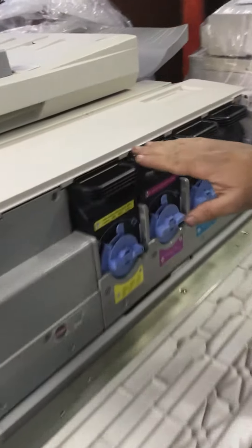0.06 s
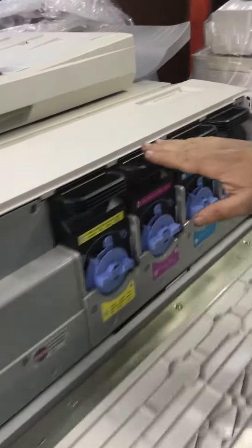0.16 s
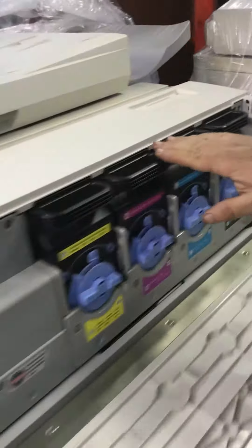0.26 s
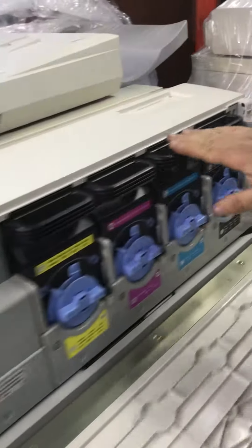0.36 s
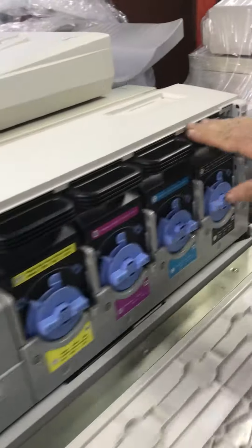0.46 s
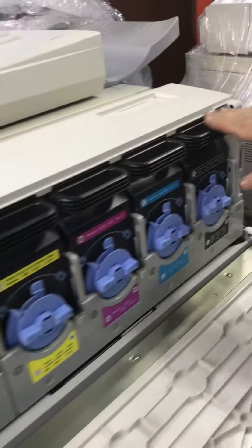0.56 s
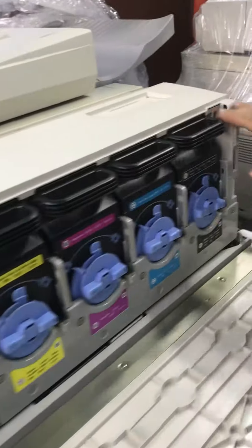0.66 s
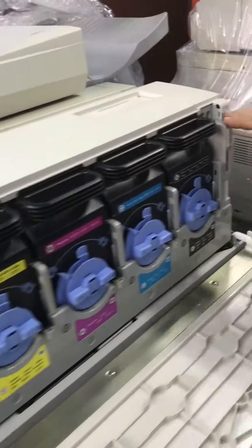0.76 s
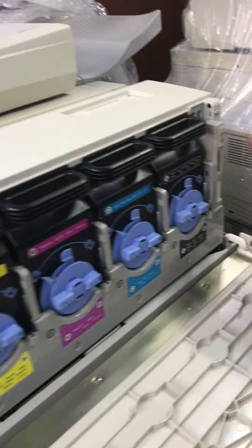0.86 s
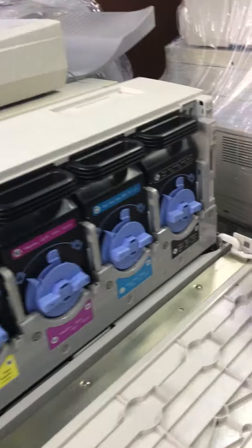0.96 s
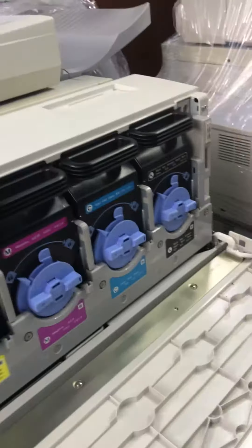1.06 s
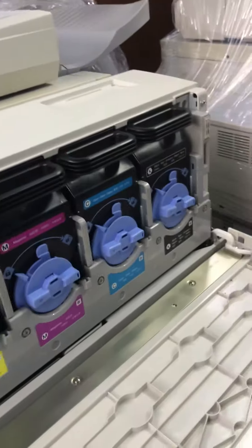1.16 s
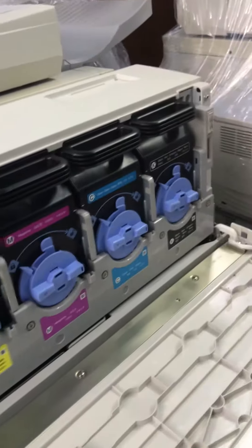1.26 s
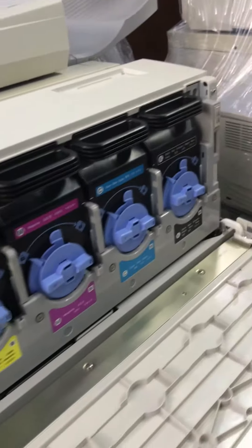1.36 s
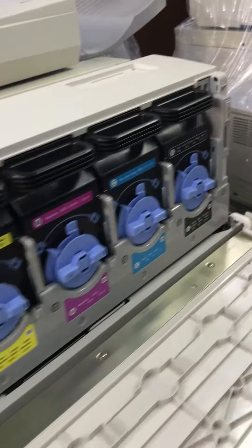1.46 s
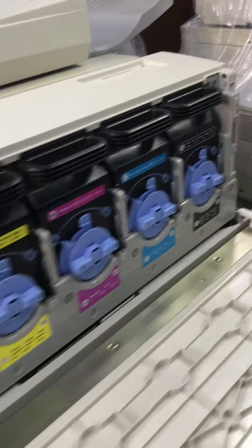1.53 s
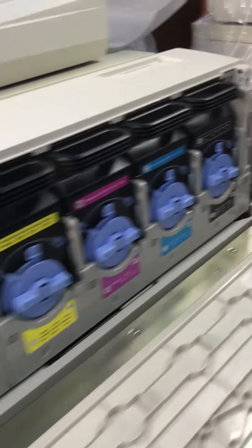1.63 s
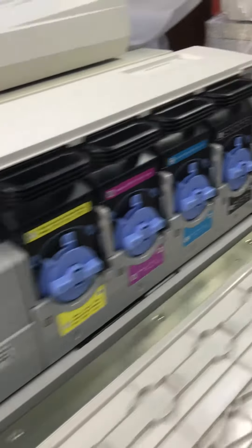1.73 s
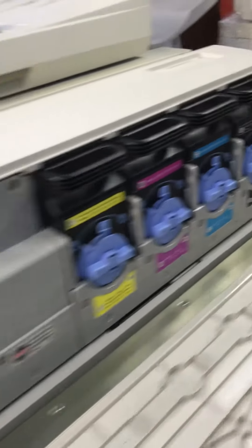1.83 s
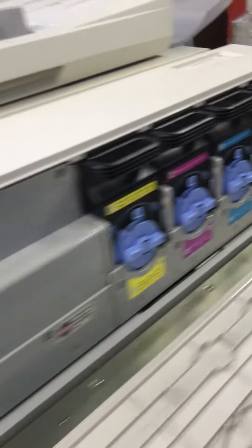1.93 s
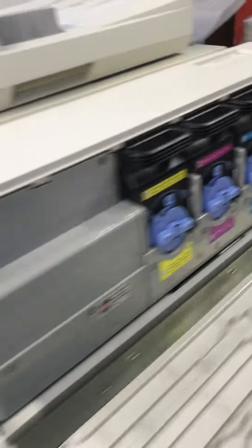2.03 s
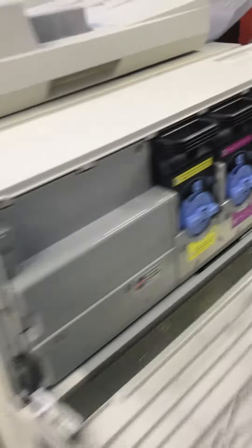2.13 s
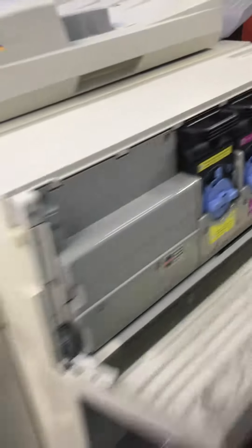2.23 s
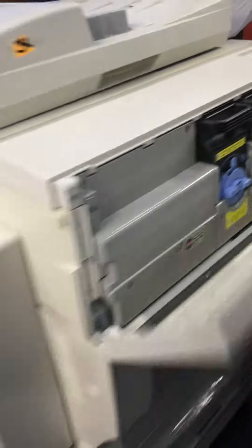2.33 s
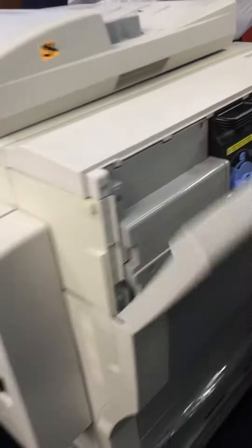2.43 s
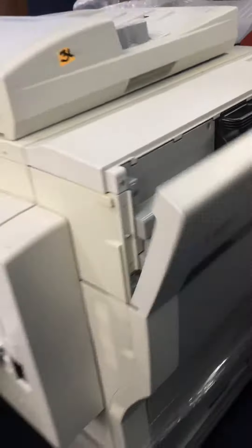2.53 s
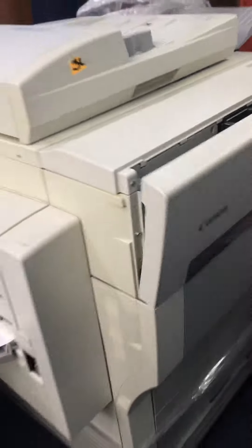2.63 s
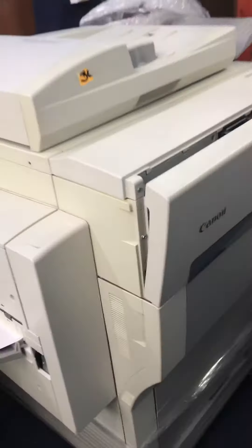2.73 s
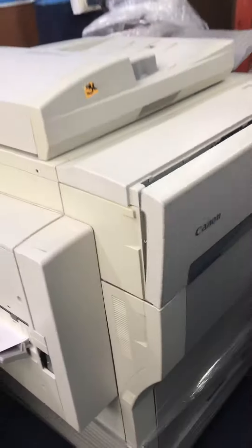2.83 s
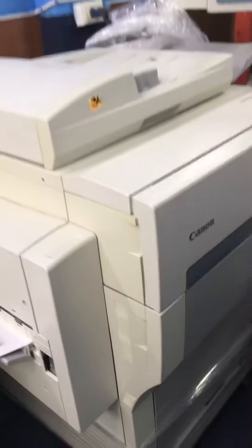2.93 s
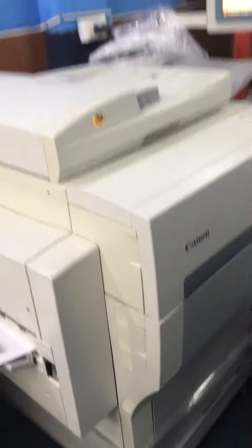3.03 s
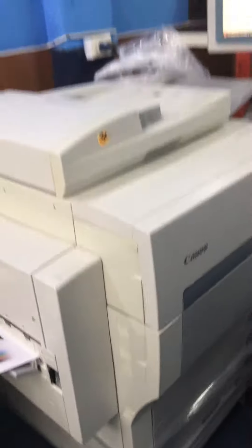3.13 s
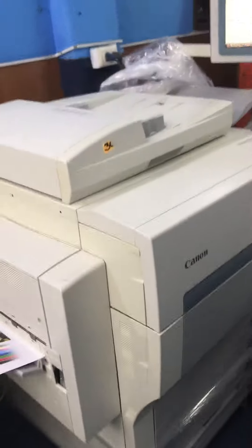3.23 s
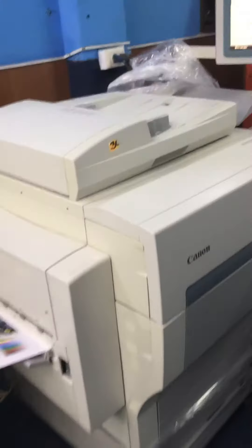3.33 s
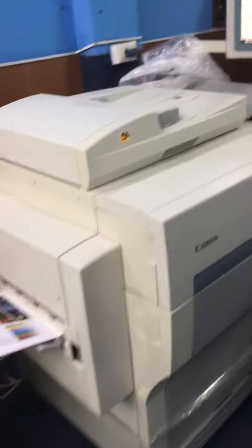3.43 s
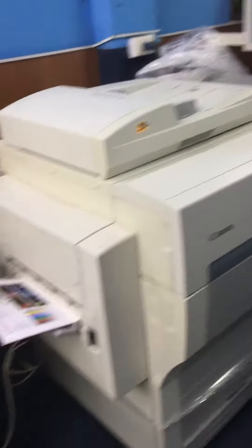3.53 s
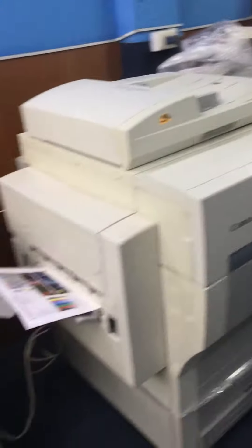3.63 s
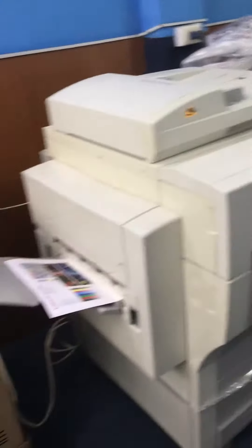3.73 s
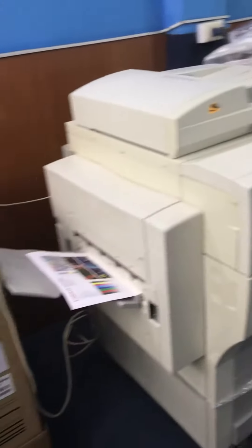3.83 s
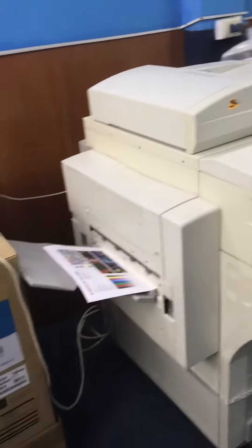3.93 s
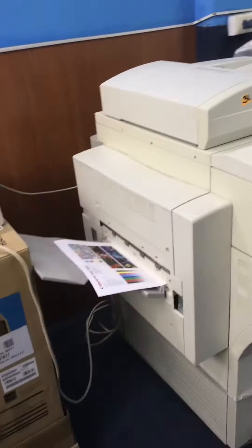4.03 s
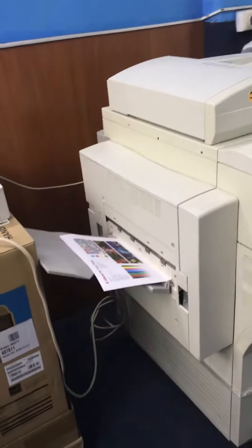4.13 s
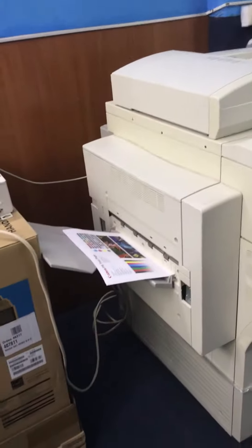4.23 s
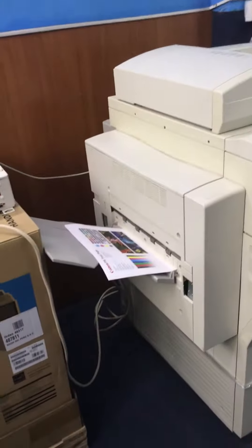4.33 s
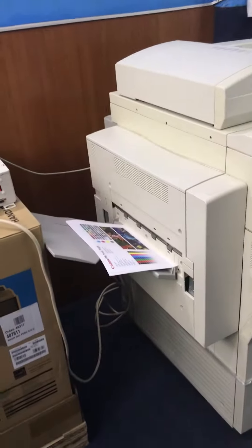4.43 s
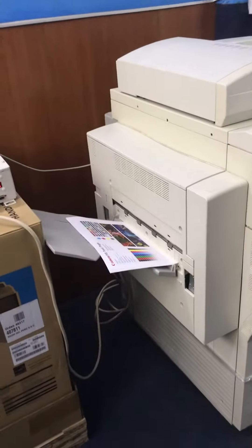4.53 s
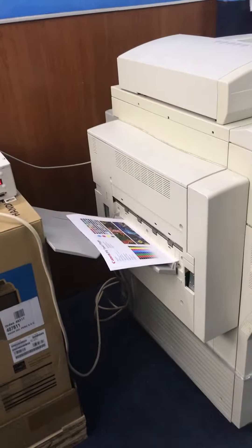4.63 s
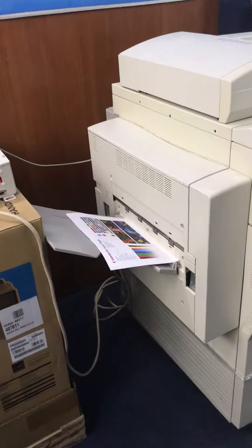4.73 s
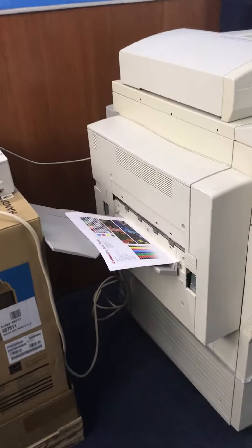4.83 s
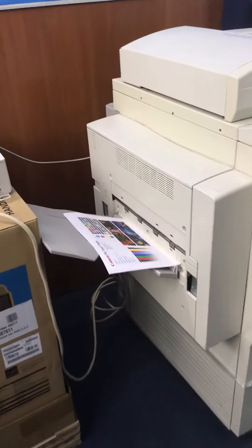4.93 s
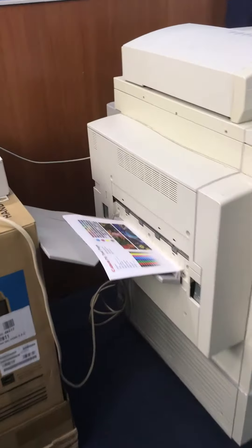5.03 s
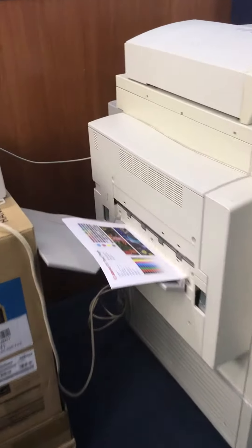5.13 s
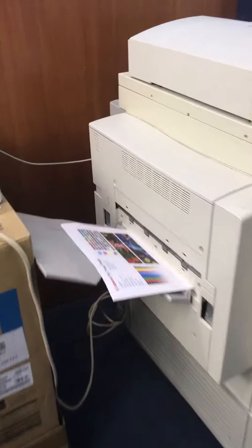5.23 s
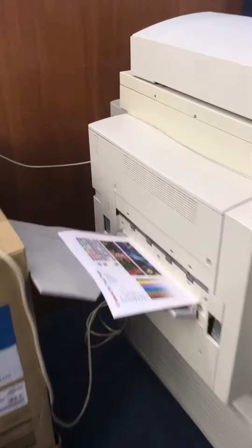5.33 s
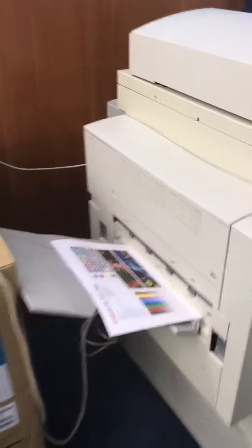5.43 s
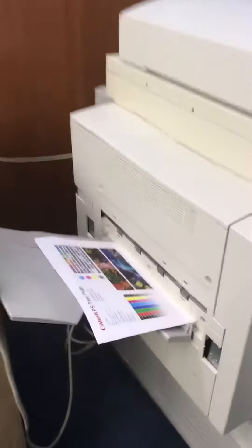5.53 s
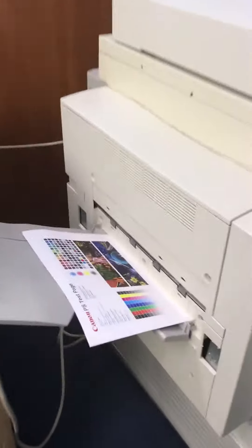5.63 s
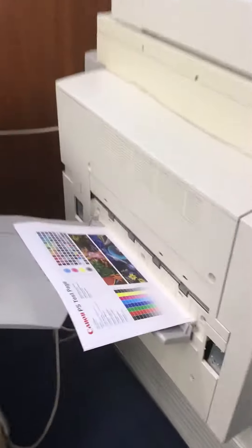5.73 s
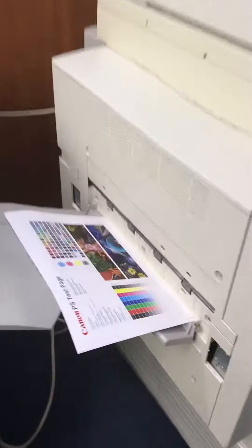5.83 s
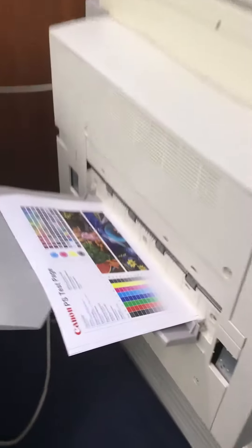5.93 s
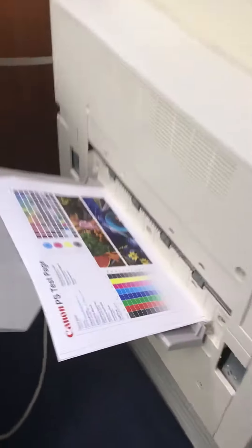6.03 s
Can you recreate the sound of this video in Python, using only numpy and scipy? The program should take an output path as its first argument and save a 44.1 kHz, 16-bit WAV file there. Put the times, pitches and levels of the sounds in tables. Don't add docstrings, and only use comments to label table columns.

```python
import sys
import numpy as np
from scipy import signal
from scipy.fft import rfft, irfft, next_fast_len
from scipy.io import wavfile
from scipy.ndimage import uniform_filter1d

SR = 44100
rng = np.random.default_rng(int(sys.argv[2]) if len(sys.argv) > 2 else 0)


def file_out(sig):
    cols = np.atleast_2d(sig).T
    lim = np.clip(cols, -1, 1)
    pcm = np.round(lim * 32767).astype(np.int16)
    wavfile.write(sys.argv[1], SR, pcm)


def nominal_scale(level):
    x = np.asarray(level, float) / 20
    return 10 ** x


N = 268569
TIME = np.arange(N) / SR
WANDER = .0011


def unit(x):
    return x / np.sqrt(np.mean(x ** 2))


def band(x, hz, width_hz):
    b, a = signal.iirpeak(min(hz, .4 * SR), max(hz / width_hz, .3), fs=SR)
    return signal.lfilter(b, a, x)


def steep(x, hz, width_hz):
    return unit(band(band(x, hz, width_hz), hz, width_hz))


def noise_band(hz, width_hz):
    return steep(rng.standard_normal(N), hz, width_hz)


def columns(table):
    s, *rest = np.transpose(table)
    return [np.interp(TIME, s, c) for c in rest]


def walk(rate_hz):
    k = int(SR / rate_hz / 16)
    coarse = np.repeat(rng.standard_normal(N // (16 * k) + 1), k)
    smooth = uniform_filter1d(uniform_filter1d(coarse, k), k)
    return 1.3 * np.repeat(smooth, 16)[:N]


def gain(db):
    return np.repeat(nominal_scale(db[::16]), 16)[:N]


def bell(s, half_s):
    return np.repeat(np.exp(-2 * ((TIME[::16] - s) / half_s) ** 2), 16)[:N]


def add(out, s, x):
    i = int(s * SR)
    out[i:i + len(x)] += x[:N - i]


def tone(hz, db, flutter_db):
    phase = 2 * np.pi * (np.cumsum(hz) / SR + rng.random()) + 0.094 * flutter_db * walk(40)
    return np.sqrt(2) * gain(db + flutter_db * walk(22.015)) * np.sin(phase)


# t/s, f/Hz, peak/dB, half length/s
HUM_SWELLS = [(.04, 64.8, -46, .05), (.17, 65.5, -43, .08), (.32, 64, -50, 0.055), (.5, 64.9, -51.5, .09),
              (.85, 59.8, -47, 0.055), (.97, 56.7, -51, .04), (1.12, 57.4, -49.5, .12),
              (1.55, 62.4, -53, 0.11), (1.9, 61.5, -52, 0.067), (2.02, 59.6, -50, 0.048),
              (2.55, 63.1, -51, .2), (2.85, 64.5, -49, 0.15), (3.085, 63.7, -38, .02),
              (3.6, 64, -56.5, 0.43), (4.09, 62.2, -47, .18), (4.51, 62.7, -46, 0.14),
              (4.75, 60.04, -54, 0.058), (4.84, 60.05, -54, 0.039), (4.96, 63, -52, .05),
              (5.08, 70.5, -59, .1), (5.24, 65.6, -40, .055), (5.63, 61.6, -40.5, .26),
              (6.07, 60.4, -41, .28)]


def hum():
    size = nominal_scale(-59) + sum(nominal_scale(db) * bell(s, half_s) for s, _, db, half_s in HUM_SWELLS)
    return size * tone(columns(HUM_SWELLS)[0], 0, flutter_db=0.7)


# t/s, level/dB
HELD_WHINE = [(0, -53.5), (.95, -61.5), (1.73, -58), (2.42, -52.5), (2.95, -53.5), (3.27, -60.5),
              (4.56, -54.5), (5.04, -62), (5.45, -51.5), (6.09, -52.5)]


def held_whine(speed):
    return tone(635.5 * speed, columns(HELD_WHINE)[0], flutter_db=0.5)


# t/s, 0 facing open door .. 1 beside paper exit
WALK_PLACE = [(0, 0.6), (.55, 0.035), (1.9, 0.056), (2.4, 0.61), (3.5, 0.95), (6.09, 1)]


def phone_place():
    return np.clip(columns(WALK_PLACE)[0], 0, 1)


# f/Hz, level at door/dB, level at exit/dB
DRONES = [(119, -58, -72), (232, -65, -61.5), (323, -76, -65), (561, -59.5, -66), (290, -66, -72),
          (2674, -73, -68), (3128, -65.5, -76), (3200, -82, -69), (150, -70, -66), (3605, -73, -80)]


def drones(speed):
    out, place = 0, phone_place()
    for hz, door_db, exit_db in DRONES:
        db = door_db + place * (exit_db - door_db) + 1.33 * walk(3.03)
        out = out + tone(hz * speed, db, flutter_db=np.clip(hz / 900, .5, 3.2))
    return out


DRUM_HZ = [2633, 2715, 3081, 3164]
# t/s, level/dB
DRUM_LEVELS = [
    [(0.05, -65), (0.33, -58.5), (0.91, -74.0), (1.01, -71), (1.63, -67), (1.79, -74.0), (2.13, -62),
     (2.53, -68.2), (2.67, -59.5), (3.51, -76), (3.85, -73), (4.13, -60), (4.43, -66.9), (4.89, -67),
     (5.01, -63), (5.15, -72), (5.77, -62.6), (6.03, -68)],
    [(0.05, -65), (0.83, -71), (0.95, -62.5), (1.47, -61.5), (1.61, -61), (1.95, -63.3), (2.07, -70.1),
     (2.43, -74.0), (2.89, -61.6), (3.05, -64), (3.51, -74.0), (3.55, -74.0), (3.59, -74.0), (4.93, -76),
     (5.47, -55), (5.81, -67.4), (5.87, -70), (6.03, -67.7)],
    [(0.05, -62.5), (0.47, -74.0), (1.03, -65), (1.23, -70.2), (1.81, -65.7), (1.89, -76), (2.07, -61),
     (2.45, -74.0), (3.07, -67.8), (3.35, -68.7), (3.41, -76), (3.75, -73.6), (4.73, -64.5), (4.87, -57),
     (5.01, -67), (5.65, -70), (5.79, -58), (6.03, -64)],
    [(0.05, -70), (0.09, -65.5), (1.01, -59.1), (1.43, -74), (1.47, -70.0), (1.93, -56), (2.13, -68.7),
     (2.19, -65), (2.87, -71.0), (3.17, -61), (3.77, -70.0), (4.01, -62.3), (4.55, -63.5), (4.93, -76),
     (5.57, -71), (5.69, -64.4), (5.87, -71.6), (6.03, -64.6)],
]


def drum_whines(speed):
    out, lift_db, null_db = 0, 0.2, -74.5
    for hz, curve in zip(DRUM_HZ, DRUM_LEVELS):
        db = np.maximum(columns(curve)[0] + lift_db, null_db) + 1.1 * walk(70)
        out = out + tone(hz * (speed + .9 * WANDER * walk(7)), db, flutter_db=2.5)
    return out


# t/s, level/dB
BEARING_LEVEL = [(0, -72), (1.7, -74), (1.95, -68), (2.3, -71), (3.3, -67), (3.9, -68), (4.4, -74),
                 (5.05, -76), (5.15, -65), (5.4, -68), (5.57, -62), (5.85, -70), (6.03, -63), (6.09, -65)]


def bearing():
    return gain(columns(BEARING_LEVEL)[0] + 3.7 * walk(45)) * noise_band(5610, 150)


# t/s, level/dB, treble tilt/dB
FAN_LEVEL = [(0, -0.5, 1), (.57, 0, -1), (.85, -.7, -2.5), (1.76, -1, -3), (2.66, 1.5, -0.5),
             (2.83, -.5, 1), (3.22, 3.5, -2.5), (3.46, 0, 0), (3.66, 1.5, -0.5), (4.17, 0, -0.3),
             (4.63, 1.5, -1.8), (5.61, 3.5, -2.5), (6.09, 5, 0)]


def nearer_db():
    level_db, tilt_db = columns(FAN_LEVEL)
    return 0.47 * (level_db + tilt_db)


GEAR_LEVELS = {10: (-71.5, -73.5), 11: (-75, -70), 12: (-68.5, -71), 13: (-70, -74.5), 18: (-80, -71)}
GEAR_GLINTS = {10: [(0.24, 9), (0.8, 5.1), (0.96, 6.4), (1.26, 11), (1.51, 6.4), (1.8, 5), (2.08, 9),
               (2.36, 13.5), (2.66, 10), (3.42, 5.3), (3.63, 9), (3.8, 10), (4.07, 5), (4.74, 7.0),
               (4.99, 12.5), (5.26, 9), (5.5, 13), (5.81, 10.5)], 11: [(0.4, 6.7), (1.82, 3.9), (2.08, 5.0),
               (2.31, 11.3), (2.6, 11.6), (2.88, 3), (3.17, 5), (3.75, 4), (3.99, 12.3), (4.26, 12.0),
               (4.52, 10), (4.94, 10.9), (5.2, 6), (5.49, 18), (5.74, 13.8)], 12: [(0.22, 3.7), (0.51, 3.9),
               (0.72, 10), (0.98, 2.9), (1.16, 4.4), (1.53, 3), (1.78, 4.1), (2.1, 1.5), (2.25, 0.8),
               (2.43, 7.6), (2.95, 8.1), (3.58, 12), (3.76, 5), (4.27, 3.1), (4.52, 1.3), (4.65, 2.1),
               (4.91, 2.5), (5.16, 5.3), (5.41, 9.5), (5.85, 8.8)], 13: [(0.35, 6.9), (0.59, 12), (0.78, 8),
               (1.0, 6.0), (1.13, 1.8), (1.35, 2.1), (1.58, 1.0), (1.76, 4), (2.0, 5), (2.22, 7),
               (2.43, 7.9), (2.78, 11), (3.81, 6.1), (4.42, 5), (4.64, 8), (5.29, 4.3), (5.75, 10)],
               18: [(0.59, 8), (2.46, 3.2), (2.64, 0), (2.94, 6.4), (3.31, 8), (3.63, 9.5), (3.91, 7),
               (4.66, 7.3), (5.1, 6.7), (5.42, 3), (5.84, 13.5)]}


def gear(speed):
    out, place, near_db = 0, phone_place(), nearer_db()
    tooth_hz, glint_s, glint_share = 448.1, 0.067, 0.96
    for k, (door_db, exit_db) in GEAR_LEVELS.items():
        db = door_db + place * (exit_db - door_db) + near_db + 2 * walk(14)
        glints_db = sum(lift_db * np.minimum(1.6 * bell(s, glint_s), 1) for s, lift_db in GEAR_GLINTS[k])
        db = np.minimum(db + glint_share * glints_db, -61)
        out = out + tone(k * tooth_hz * (speed + WANDER * walk(11)), db, flutter_db=2.2)
    return out


# f/Hz, mean level/dB
WEAK_TONES = [(760, -69), (918, -68), (1292, -72), (1384, -71), (1550, -70), (2272, -77), (3523, -78),
              (4035, -77), (4237, -81), (5155, -79), (6278, -77), (6481, -83), (6722, -76.5), (7130, -78),
              (7172, -76), (7472, -79), (8414, -82), (8466, -75), (8742, -81), (9415, -78), (9822, -81.5),
              (10296, -81), (10718, -81.5), (11200, -87)]


def weak_tones(speed):
    out, near_db = 0, nearer_db()
    for hz, db in WEAK_TONES:
        level_db = db + .2 + near_db + 2.5 * walk(4)
        out = out + tone(hz * (speed + WANDER * walk(8)), level_db, flutter_db=3.0)
    return out


def motors():
    gained = .002
    speed = 1 + gained * (TIME / TIME[-1] - .5) + 0.000397 * walk(6)
    out = hum() + held_whine(speed) + drones(speed) + drum_whines(speed)
    return out + bearing() + gear(speed) + weak_tones(speed)


# f/Hz, density/dB per Hz
AIR_SPECTRUM = [(22, -8.5), (68, -3), (114, -10), (242, -8), (394, -14), (680, -12.5), (1250, -15.5),
                (2100, -23.5), (3900, -26.5), (6000, -26), (7600, -33), (12200, -35.5), (14800, -34.5),
                (17000, -32)]
# f/Hz, width/Hz, lift/dB
VENT_LIFTS = [(165, 46, 1.6), (300, 44, 2), (2667, 140, 8), (3130, 310, 8), (4040, 68, 2), (5560, 500, 4.5),
              (8460, 1000, 7.5), (9580, 330, 3.5), (11000, 640, 2)]


def fans():
    out, size = 0, next_fast_len(N)
    mids, tilt = (c - c.mean() for c in columns(FAN_LEVEL))
    lows, highs = 0.51 * mids, mids + tilt
    hz = np.fft.rfftfreq(size, 1 / SR)
    octaves = np.log2(hz + 1)
    air_hz, air_db = np.transpose(AIR_SPECTRUM)
    db = np.interp(octaves, np.log2(air_hz), air_db)
    db += sum(lift * np.exp(-(2 * (hz - f) / width) ** 2) for f, width, lift in VENT_LIFTS)
    db += 2.2 * walk(90)[:len(hz)] * np.clip(hz / 3500, .25, 1)
    shaped = rfft(rng.standard_normal(size)) * nominal_scale(db)
    for octave in np.arange(4.2, 14.6, .5):
        share = np.cos(np.pi / 2 * np.clip((octaves - octave) / .5, -1, 1)) ** 2
        part = np.interp(octave, [8.2, 10.3, 12.8], [0, 1, 2])
        move_db = max(1 - part, 0) * lows + (1 - abs(part - 1)) * mids + max(part - 1, 0) * highs
        out = out + gain(move_db + 1.2 * walk(9)) * irfft(shaped * share, size)[:N]
    return unit(out) * nominal_scale(-48.5)


# t/s, level/dB
HAND_RUB = [(0, -67), (.11, -60), (.2, -66), (.32, -62), (.4, -69), (.6, -59.5), (.874, -75), (.89, -83)]


def hand():
    db = np.where(TIME <= HAND_RUB[-1][0], columns(HAND_RUB)[0], -120)
    out = 0
    for hz, band_db in [(8000, -12), (9300, -5.0), (11500, -10), (13200, -4.5), (14800, -3.5)]:
        patches = gain(band_db + 2.0 * walk(25.2) + 2.5 * walk(120))
        out = out + patches * noise_band(hz, 1900)
    return gain(db) * out


# t/s, peak/dB, f/Hz, width/Hz, rise/ms, fall/ms
DOOR_CATCH = (3.0465, -12.5, 7200, 600, .5, 2)
# t/s, peak/dB, f/Hz, fall/ms
EDGE_GRAZES = [(.29, -52, 9000, 6), (.345, -50, 9000, 15), (.475, -51, 9200, 6), (.515, -52, 9300, 12),
               (.69, -46, 4060, 8.8), (.745, -43, 9300, 5.9), (3.777, -35, 13000, 4.4),
               (5.961, -44, 2080, 10), (5.975, -45, 2080, 10)]
PART_RINGS = [(2.148, -26.5, 1680, 1.9), (2.136, -41, 2700, 3), (2.711, -33.5, 4200, 2.2),
              (2.7625, -38, 2850, 2.5), (2.7725, -37, 2900, 2.5), (3.683, -36, 1600, 3),
              (3.664, -38, 1345, 4.1), (3.669, -42, 1600, 4), (2.148, -42, 12500, 4), (2.149, -45, 9000, 3),
              (2.1475, -35, 3200, 1.5), (2.181, -48, 12000, 3.7), (2.192, -49, 12000, 3.7),
              (2.7255, -31, 1790, 5), (2.734, -26.5, 1030, 3.8), (3.0225, -36, 3200, 4),
              (3.0225, -28.5, 1050, 4), (4.628, -45, 12600, 5), (4.842, -53, 12500, 4),
              (2.72, -39, 2900, 3), (2.728, -40, 2900, 5), (2.4, -43, 4100, 5), (2.749, -36, 1900, 3)]
PLASTIC_KNOCKS = [(2.151, -35.5, 3900, 3), (2.711, -40.5, 8100, 7.1), (2.7108, -34, 1130, 7),
                  (2.716, -30.5, 830, 7.1), (2.4215, -40, 1260, 5), (3.0215, -35, 2200, 5.7),
                  (3.031, -40, 1300, 6), (3.7797, -38.5, 3600, 6), (4.621, -45, 9500, 4.2),
                  (4.625, -49, 13500, 20), (4.623, -48, 5800, 14)]
BROAD_SNAPS = [
    (2.193, -45, 4500, 3),
    (2.4199, -36, 4800, 3.9),
    (3.7722, -40, 4940, 13),
]
SHORT_SCRAPES = [(2.48, -48, 330, 32), (2.6, -53, 6500, 11), (2.72, -38, 3200, 14), (2.723, -33, 1500, 7),
                 (2.73, -33, 900, 5), (2.739, -34, 1200, 4), (2.745, -43, 1600, 25), (5.905, -42, 650, 22),
                 (3.6637, -44, 800, 9)]
SPRING_PINGS = [
    (3.7735, -44, 12600, 5),
    (3.79, -58, 12600, 40),
    (3.888, -49, 12600, 6),
    (3.795, -49, 4300, 15),
]


def ticks():
    out, t_ms = np.zeros(N), TIME[:6000] * 1000
    kinds = [  # table, Q, rise/ms
        (EDGE_GRAZES, 8, 3.5), (PART_RINGS, 5, .7), (PLASTIC_KNOCKS, 1.3, .6),
        (BROAD_SNAPS, 0.65, 1.1), (SHORT_SCRAPES, 1.1, 3.1), (SPRING_PINGS, 22, 1)]
    rows = [DOOR_CATCH]
    for table, q, rise_ms in kinds:
        rows += [(s, db, hz, hz / q, rise_ms, fall_ms) for s, db, hz, fall_ms in table]
    for s, db, hz, width_hz, rise_ms, fall_ms in rows:
        burst = steep(rng.standard_normal(len(t_ms)), hz, width_hz)
        add(out, s, nominal_scale(db) * burst * (1 - np.exp(-t_ms / rise_ms)) * np.exp(-t_ms / fall_ms))
    return out


# t/s, peak/dB, f/Hz, fade/cycles
JOINT_SLIPS = [(2.468, -44, 250, .84), (2.482, -42, 130, .9), (2.494, -34, 382, 1.7),
               (2.502, -39, 330, .81), (2.52, -38, 200, .83), (2.531, -43, 170, .7), (2.545, -42, 300, .8),
               (2.563, -38, 260, 0.65), (2.7405, -27.5, 463, 1.7), (2.743, -34, 179, 0.88),
               (2.7522, -27, 540, 2.4), (2.7522, -31, 191, 0.89), (2.763, -28, 564, 2.1),
               (2.764, -36, 190, 0.8), (2.7738, -28.5, 560, 2.5), (2.774, -34, 200, 0.9),
               (3.0563, -12.5, 698, 2.8), (3.054, -25.5, 234, 2.4), (3.0625, -27.5, 590, 4),
               (3.073, -29, 250, 3), (3.086, -29, 332, 2.5), (3.084, -27.5, 583, 4), (3.104, -37, 280, 3),
               (3.109, -32, 580, 6), (3.036, -40, 260, 1.1), (3.0395, -42, 300, 0.93), (3.080, -25, 735, 5),
               (3.107, -32, 765, 4.6), (3.0494, -24, 977, 5.2), (3.052, -23, 1480, 5.4),
               (3.064, -26.5, 1460, 7), (3.081, -28.5, 1200, 7.5), (2.7325, -32, 500, 1.5),
               (3.669, -42, 400, 1.5), (3.684, -40, 560, 1.5), (4.74, -47, 145, 3), (4.79, -48.5, 140, 3),
               (2.7865, -32, 297, .75), (2.796, -28, 230, .8), (2.809, -34, 120, .8), (2.828, -49, 110, .8),
               (5.897, -35.5, 190, 1.05), (5.9035, -36, 300, 1), (5.9105, -32, 417, .95),
               (5.918, -31, 150, 1.5), (5.925, -34, 331, .92), (5.932, -35, 450, 1), (5.948, -34, 420, .93),
               (5.953, -35, 250, 1), (5.9665, -33, 200, 1.3)]


def creaks():
    out, t = np.zeros(N), TIME[:3000]
    for s, db, hz, cycles in JOINT_SLIPS:
        knock = np.sin(2 * np.pi * hz * t)
        knock += 0.25 * np.sin(2 * np.pi * 2.32 * hz * t) + 0.2 * np.sin(.7 * np.pi * hz * t)
        shape = np.exp(-t * hz / cycles) * (1 - np.exp(-t / 0.00082))
        add(out, s - 0.34 / hz, 1.59 * nominal_scale(db) * knock * shape)
    return out


# t/s, crack/dB, crack f/Hz, thud/dB, length/ms
SLAM_CONTACTS = [(3.0458, -6, 11000, -15.5, 1.93), (3.0495, -19, 9000, -15, 2.6),
                 (3.053, -14, 3300, -15, 2.7), (3.0555, -18, 9000, -13, 3.2),
                 (3.0566, -15, 3000, -20.5, 2.5), (3.0615, -23, 3000, -20, 4.8),
                 (3.069, -31.5, 3500, -22.5, 8), (3.078, -38, 4000, -19.5, 5.3),
                 (3.086, -36, 4000, -23.5, 5.3), (3.096, -41, 4000, -31.5, 25), (3.107, -44, 4000, -30, 8),
                 (3.117, -46, 5000, -35, 33)]
# f/Hz, width/Hz, level/dB
PANEL_MODES = [(86, 66, -13), (177, 54, -9.5), (250, 73, -8.5), (404, 200, -6), (590, 112, -4),
               (763, 154, -4), (960, 210, -3), (1200, 230, -5), (1460, 190, -4.5), (1860, 480, -3.5),
               (2760, 800, -6.5), (4500, 530, -11.5)]


def door():
    out, t_ms = np.zeros(N), TIME[:4000] * 1000
    for s, crack_db, hz, thud_db, ms in SLAM_CONTACTS:
        noise = rng.standard_normal((2, len(t_ms)))
        shape = (1 - np.exp(-t_ms / .9)) * np.exp(-t_ms / ms)
        push = 1.9 * np.exp(-((t_ms - .4) / 0.083) ** 2)
        shake = noise[1] * shape + push
        thud = sum(nominal_scale(db) * steep(shake, f, width) for f, width, db in PANEL_MODES)
        size = nominal_scale(thud_db - 5.5) * np.sqrt(ms / t_ms[-1])
        crack = steep(noise[0], hz, 1.1 * hz) * shape
        add(out, s, nominal_scale(crack_db) * crack + size * thud)
    return out


# f/Hz, t60/s, level/dB
ROOM_BANDS = [(125, 0.48, -0.5), (350.1, .36, -4), (1000, 0.36, 0), (2800, 0.45, -0.5), (6000, 0.25, 0.5),
              (12000, .22, -1.5)]


def room(x):
    t, tail = TIME[:int(.7 * SR)], 0
    for hz, t60_s, db in ROOM_BANDS:
        tail = tail + nominal_scale(db) * band(rng.standard_normal(len(t)), hz, hz) * 1000. ** (-t / t60_s)
    tail *= 1 - np.exp(-t / 0.002)
    return nominal_scale(-10.5) * signal.fftconvolve(x, tail / np.sqrt(np.sum(tail ** 2)))[:N]


def scene():
    hits = ticks() + creaks() + door()
    return (motors() + fans() + hand() + hits + room(hits))[None]


def roll_off(x):
    return signal.sosfilt(signal.butter(12, 17040, fs=SR, output="sos"), x)


def record(dry):
    size, top_hz, crack_top_hz = next_fast_len(N), 15820, 16700
    hz, spectrum = np.fft.rfftfreq(size, 1 / SR), rfft(dry, size)
    low = irfft(spectrum * (hz < top_hz), size)[:, :N]
    top = irfft(spectrum * ((hz >= top_hz) & (hz < crack_top_hz)), size)[:, :N]
    crack = np.clip(uniform_filter1d(np.abs(top), 200) / nominal_scale(-44) - 1, 0, 1)
    return roll_off(low + uniform_filter1d(crack, 100) * top)


dry = scene()
out = record(dry)
file_out(out)
```